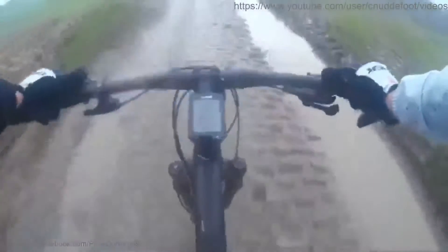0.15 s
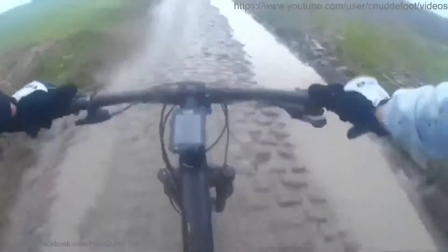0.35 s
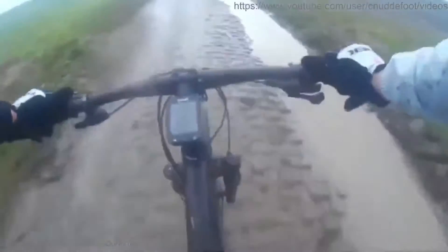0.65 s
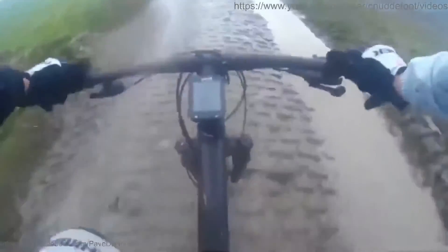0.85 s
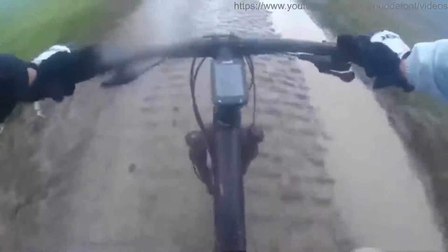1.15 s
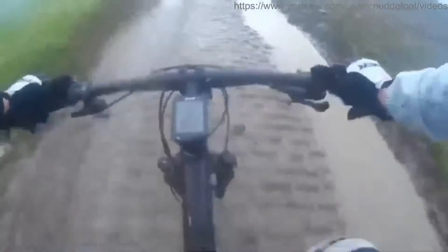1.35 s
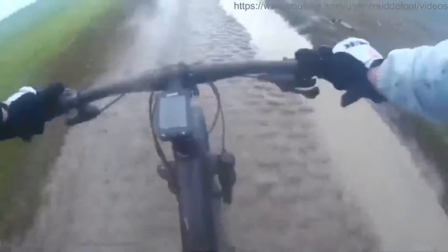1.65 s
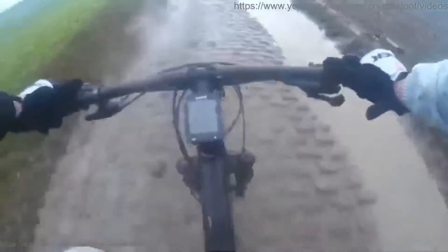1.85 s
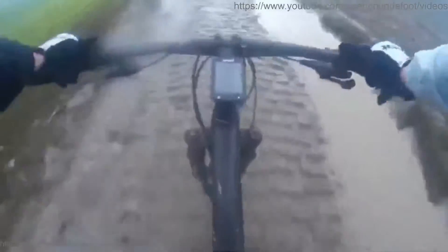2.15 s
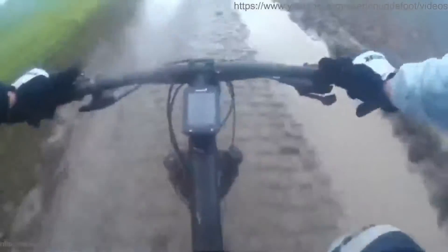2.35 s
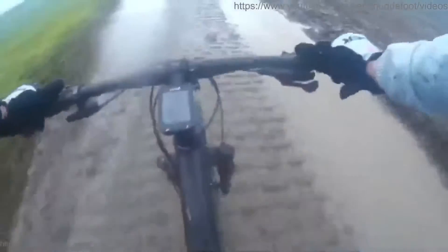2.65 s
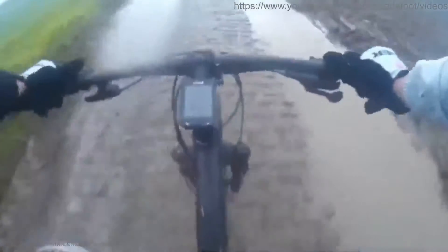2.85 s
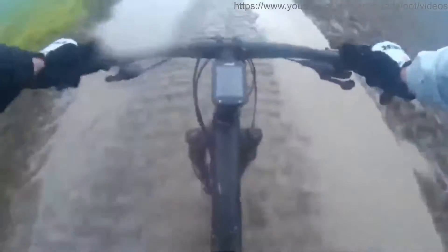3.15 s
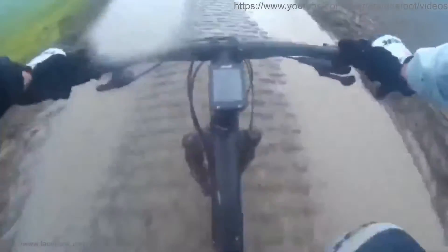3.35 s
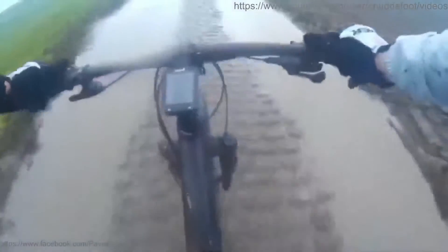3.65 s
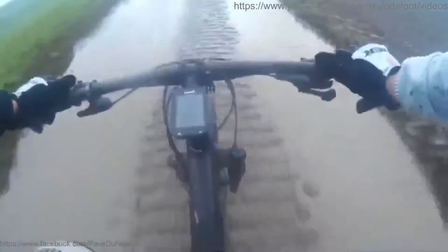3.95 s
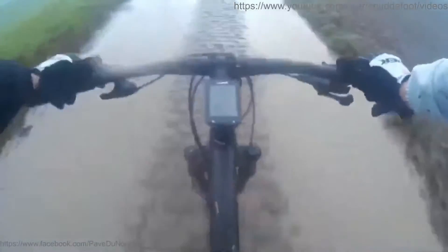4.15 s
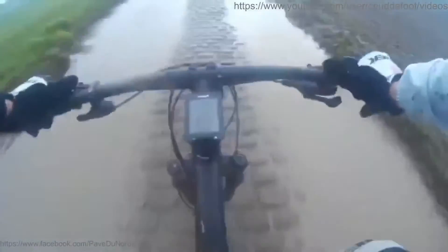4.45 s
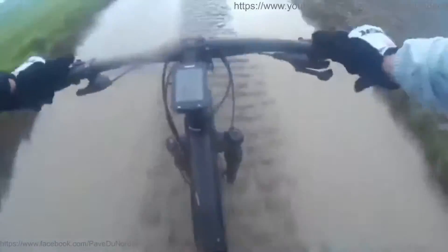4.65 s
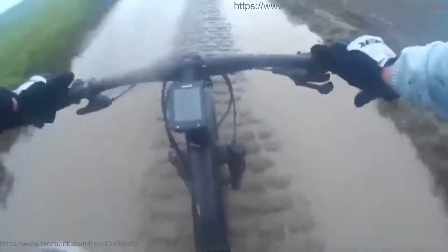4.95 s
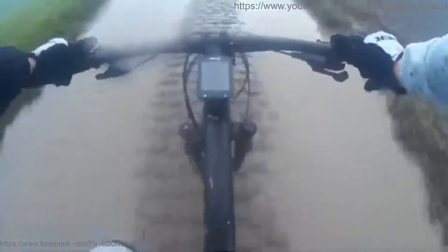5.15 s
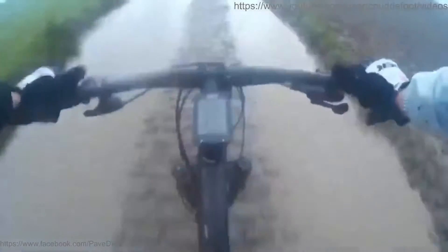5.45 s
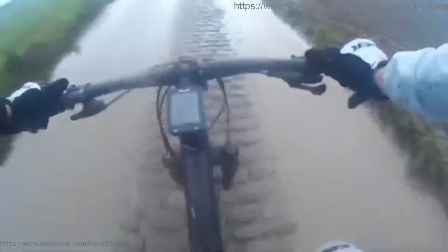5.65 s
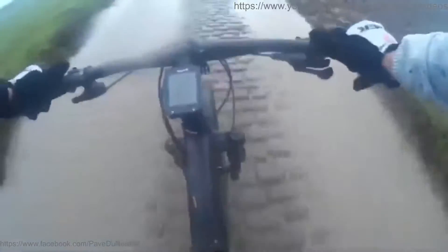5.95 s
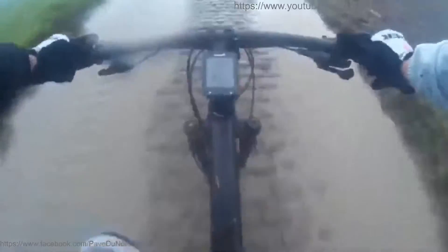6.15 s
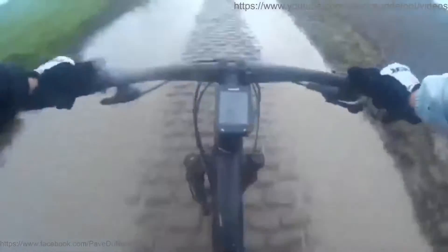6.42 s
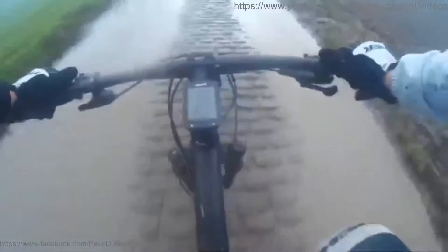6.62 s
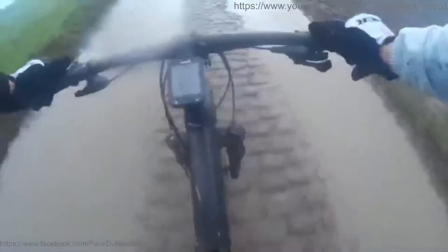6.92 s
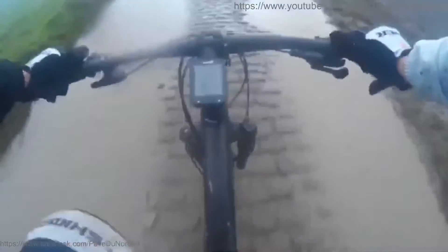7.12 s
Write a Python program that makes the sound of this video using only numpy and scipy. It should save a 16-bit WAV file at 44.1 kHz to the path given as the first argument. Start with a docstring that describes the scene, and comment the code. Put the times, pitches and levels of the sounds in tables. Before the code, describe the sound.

Muffled, booming wind and a constant dull rattle of bumpy stones, broken by knocks and thumps, with quiet muddy tyre spray and tiny squeaks.

```python
"""On wet, muddy cobbles: a bicycle rides fast, heard by a camera in a closed case on the rider's chest.
Wind (shaped noise), deep single thumps (short cosine swings) and hums (gliding sines) reach the case.
The stones shake it: random blows make a dull rattle, damped case modes make thuds, clacks and taps.
The tyres swish and throw grit (noise, drops, bubbles); a wet part squeaks in gliding tones."""
import sys
import numpy as np
from scipy import signal
from scipy.fft import rfft, irfft, next_fast_len
from scipy.io import wavfile
from scipy.ndimage import uniform_filter1d

SR = 44100
rng = np.random.default_rng(int(sys.argv[2]) if len(sys.argv) > 2 else 0)


def digitize_waveform(pressure):
    """Quantize a signal to 16-bit integers and store it at the path in sys.argv[1].

    Rows of a 2-D input are taken as channels; values are limited to [-1, 1].
    """
    field = np.atleast_2d(pressure).T
    bounded = np.clip(field, -1, 1)
    quanta = np.round(bounded * 32767).astype(np.int16)
    wavfile.write(sys.argv[1], SR, quanta)


N = 321288

# Modes of the case and its mount. Each row: frequency in Hz, relative level in dB, t60 in seconds.
CASE_MODES = [(337, -21, 0.011), (488, 8, 0.025), (561.5, 0, 0.26), (656, 2.5, 0.044), (769.5, 6, 0.03),
              (1177, -1, 0.024), (1274, -15, 0.057), (1840, -17, 0.035), (2274, -7, 0.044),
              (2740, -18, 0.03), (3175, -18, 0.065), (3700, -15, 0.043), (3945, -14.5, 0.047),
              (4380, -17, 0.031), (5030, -19, .02), (8130, -15, .015)]


def undb(db):
    """Decibels to gain."""
    return 10 ** (np.asarray(db) / 20)


def unit(x):
    """Scale to an rms of one."""
    return x / np.sqrt(np.mean(x ** 2))


def peak(x, db):
    """Scale to a peak level in dB."""
    return undb(db) * x / np.abs(x).max()


def colour(x, spectrum):
    """Minimum-phase filter through (Hz, dB) points, so that blows keep sharp fronts; rms of one."""
    hz, db = np.transpose(spectrum)
    size = next_fast_len(N + SR // 4)
    size += size % 2
    f = np.maximum(np.arange(size // 2 + 1) * SR / size, 1)
    gain = undb(np.interp(np.log(f), np.log(hz), db))
    cepstrum = irfft(np.log(gain))
    # fold the cepstrum to its causal half
    cepstrum[1:size // 2] *= 2
    cepstrum[size // 2 + 1:] = 0
    response = np.exp(rfft(cepstrum))
    return unit(irfft(rfft(x, size) * response)[:N])


def band(x, lo_hz, hi_hz):
    """Gentle band-pass."""
    sos = signal.butter(2, [lo_hz, hi_hz], "band", fs=SR, output="sos")
    return signal.sosfilt(sos, x)


def walk(rate_hz):
    """Random levels held 1 / rate_hz seconds and smoothed twice; rms of one."""
    k = int(SR / rate_hz)
    held = np.repeat(rng.standard_normal(N // k + 1), k)
    return unit(uniform_filter1d(uniform_filter1d(held, k), k)[:N])


def patter(rate_hz, spread_db):
    """Random tiny blows of either sign and unequal size, rate_hz a second on average; rms of one."""
    hits = rng.random(N) < rate_hz / SR
    signs = rng.choice([-1, 1], N)
    sizes = undb(spread_db * rng.standard_normal(N).clip(-2, 2))
    return unit(hits * signs * sizes)


def follow(curve):
    """Each level column of a table with time in seconds first, joined by straight lines."""
    s, *columns = np.transpose(curve)
    return [np.interp(np.arange(N) / SR, s, column) for column in columns]


def add(out, s, sound):
    """Mix a sound in at time s in seconds."""
    i = max(int(s * SR), 0)
    out[i:i + len(sound)] += sound[:max(N - i, 0)]


def case_ring(modes=CASE_MODES, swell_s=0.001):
    """The case's answer to one tap: decaying modes, the attack rounded by its rubber mount."""
    t = np.arange(SR // 10) / SR
    ring = np.zeros(len(t))
    for hz, db, t60_s in modes:
        ring += undb(db) * np.sin(2 * np.pi * hz * t) * np.exp(-np.log(1000) * t / t60_s)
    return ring * (1 - np.exp(-(t / swell_s) ** 2))


def hiss(level_db=-69.5, swing_db=0.65):
    """The microphone's own noise, its level swinging slightly."""
    # Each row: frequency in Hz, relative density in dB per Hz.
    hiss_spectrum = [(100, 0), (3000, 0), (8000, 0), (15000, 0)]
    level = undb(level_db + swing_db * walk(13))
    return level * colour(rng.standard_normal(N), hiss_spectrum)


def wind(buffet_trim_db=0.5, flutter_trim_db=-1.5, eddy_swing_db=0.17, burst_swing_db=1.12):
    """Turbulent pressure on the case: large eddies boom, small ones burst against it one by one."""
    # Each row: start in seconds, large-eddy level in dB, small-eddy level in dB, both before trim.
    wind_curve = [(0.0, -32, -25.5), (0.1, -38.5, -35.5), (0.23, -34.5, -30.5), (0.49, -37, -38.5),
                  (0.75, -36.5, -32), (0.96, -33, -33.5), (1.1, -37, -35), (1.25, -34.5, -36.5),
                  (1.36, -40.5, -39.5), (1.78, -36.5, -38), (2.04, -34, -33.5), (2.16, -29, -30),
                  (2.23, -34, -37), (2.34, -32.5, -34.5), (2.47, -32.5, -33.5), (2.58, -33.5, -31.5),
                  (2.7, -44, -31), (2.76, -40, -48), (2.88, -33, -28.5), (3.0, -35, -37),
                  (3.19, -34, -31.5), (3.4, -36.5, -38), (3.5, -33.5, -34.5), (3.75, -35, -38.5),
                  (3.87, -36.5, -43.5), (4.06, -33.5, -34), (4.29, -34, -31.5), (4.38, -38.5, -38.5),
                  (4.58, -32.5, -32), (4.72, -41.5, -40.5), (4.97, -35.5, -40.5), (5.04, -36, -32),
                  (5.17, -37.5, -35), (5.27, -35.5, -30), (5.45, -34, -37), (5.68, -39.5, -43),
                  (5.78, -36, -37), (6.02, -38, -36.5), (6.14, -38, -36), (6.36, -34, -31),
                  (6.54, -40, -35), (6.66, -34, -33.5), (6.87, -32, -35.5), (7.02, -29.5, -40.5),
                  (7.09, -38, -38.5), (7.18, -32, -34.5), (7.29, -36, -34)]
    # Spectra of large and small eddies. Each row: frequency in Hz, relative density in dB per Hz.
    buffet_spectrum = [(8, -13), (20, 4), (45, 1.5), (90, -0.5), (125, -5.5), (180, -16.5), (400, -37.5),
                       (1500, -71.5)]
    flutter_spectrum = [(50, -11.5), (100, -1), (135, 0.5), (200, -3), (250, -5), (330, -11.5),
                        (800, -26.5), (1500, -43), (4000, -71)]
    buffet_db, flutter_db = follow(wind_curve)
    large = colour(rng.standard_normal(N), buffet_spectrum)
    large *= undb(eddy_swing_db * walk(20).clip(-2, 2))
    bursts = rng.standard_normal(N) + undb(-5) * patter(220, spread_db=2.5)
    small = colour(bursts, flutter_spectrum)
    small *= undb(burst_swing_db * walk(22).clip(-2, 2))
    return large * undb(buffet_db + buffet_trim_db) + small * undb(flutter_db + flutter_trim_db)


def thumps(width_cycles=0.29):
    """Deep single thumps, from wind eddies or hard knocks: each a cosine in a Gaussian."""
    # Each row: centre in seconds, peak in dB, pitch in Hz.
    thump_rows = [(1.496, -22, 45), (1.941, -24, 70.4), (2.365, -22, 39.5), (3.185, -19.5, 70),
                  (4.282, -18, 70.5), (4.722, -22.5, 38), (6.27, -25, 50.3)]
    out, now = np.zeros(N), np.arange(N) / SR
    for s, db, hz in thump_rows:
        cycles = (now - s) * hz
        out += undb(db) * np.cos(2 * np.pi * cycles) * np.exp(-(cycles / width_cycles) ** 2)
    return out


def hums(waver=0.046, rough_db=2.0, trim_db=1.5):
    """Air shedding off the edge of the case gives a short, unsteady low tone of rising pitch."""
    # Each row: start in seconds, length in seconds, first and last pitch in Hz before waver,
    # level in dB before trim and roughness.
    hum_rows = [(0.9, 0.12, 187, 219, -37), (1.987, 0.094, 186.4, 246, -29.5), (2.076, .1, 247, 289, -35.5)]
    out, now = np.zeros(N), np.arange(N) / SR
    wobble, rough = 1 + waver * walk(120), rough_db * walk(100)
    for s, length_s, first_hz, last_hz, db in hum_rows:
        on = (now > s) & (now < s + length_s)
        pitch_hz = np.linspace(first_hz, last_hz, on.sum()) * wobble[on]
        phase = 2 * np.pi * np.cumsum(pitch_hz) / SR
        out[on] += undb(db + trim_db + rough[on]) * np.hanning(on.sum()) * np.sin(phase)
    return out


def squeaks(waver=0.025, scrape_db=-9, fade_db=17):
    """A wet rubbing part squeals: a gliding tone swells and breaks off, with faint scraping noise."""
    # Each row: start in seconds, length in seconds, first and last pitch in Hz before waver,
    # loudest point as a share of the length, tone level there in dB.
    squeak_rows = [(3.14, 0.038, 2100, 1820, .3, -52.5), (3.168, 0.023, 2150, 1860, .5, -53),
                   (4.239, 0.046, 1545, 2240, 0.8, -45), (4.284, .013, 1930, 2250, .5, -56),
                   (6.75, 0.031, 1860, 1970, .4, -57), (6.827, 0.051, 1855, 2080, 0.6, -54)]
    out, now = np.zeros(N), np.arange(N) / SR
    wobble = 1 + waver * walk(450)
    scrape = undb(scrape_db) * unit(band(rng.standard_normal(N), 1600, 2310))
    for s, length_s, first_hz, last_hz, crest, db in squeak_rows:
        on = (now > s) & (now < s + length_s)
        along = (now[on] - s) / length_s
        pitch_hz = np.interp(along, [0, 1], [first_hz, last_hz]) * wobble[on]
        fade = np.interp(along, [0, crest, 1], [1, 0, 1])
        size = undb(db - fade_db * fade ** 1.05) * signal.windows.tukey(len(along), 0.1)
        phase = 2 * np.pi * np.cumsum(pitch_hz) / SR
        out[on] += size * (np.sin(phase) + scrape[on])
    return out


def grit(tyre_db, level_db=-8):
    """Sand and mud flung from the tread tick against the frame, following the tyre level."""
    ticks = band(band(patter(240, spread_db=3.5), 1630, 2540), 1350, 3200)
    return undb(tyre_db + level_db) * unit(ticks)


def bubbles(rate_hz=110, decay_s=0.005, attack_s=0.0011):
    """Tiny bubbles burst in the puddles, each a decaying ping at its own rising pitch."""
    out, t = np.zeros(N), np.arange(SR // 20) / SR
    envelope = np.exp(-t / decay_s) * (1 - np.exp(-t / attack_s))
    for when, pitch, size in rng.random((int(rate_hz * N / SR), 3)):
        start_hz = 1650 * 1.4 ** pitch
        ping = np.sin(2 * np.pi * start_hz * (t + 1.1 * t ** 2)) * envelope
        add(out, when * N / SR, undb(14 * size ** 2) * ping)
    return unit(out)


def swish(tyre_db, dull_hz=2760, dull_above_db=-69):
    """Muddy water flung from the tread: fine spray with drops and bubbles, duller when loud."""
    # Each row: frequency in Hz, relative density in dB per Hz.
    swish_spectrum = [(700, -42), (1400, 1.5), (1600, -2), (1700, 3.5), (2050, 0.5), (2280, -9),
                      (2480, -13.5), (2700, -6.5), (3000, -13.5), (3350, -15.5), (3700, -11.5),
                      (4600, -18.5), (6500, -34.5)]
    spray = rng.standard_normal(N) + undb(-8) * patter(260, spread_db=3.5)
    spray *= undb(3.3 * walk(66).clip(-2, 2))
    splash = colour(spray, swish_spectrum) + undb(-7.5) * bubbles()
    dull = signal.sosfiltfilt(signal.butter(3, dull_hz, fs=SR, output="sos"), splash)
    # the treble stops growing above dull_above_db
    treble_db = np.minimum(tyre_db, dull_above_db) + 3
    return dull * undb(tyre_db) + (splash - dull) * undb(treble_db)


def chatter(level_db=-66):
    """The shaking mount keeps tapping lightly and dully against the case."""
    taps = patter(160, spread_db=2)
    return undb(level_db) * unit(signal.fftconvolve(taps, band(case_ring(), 1110, 1390))[:N])


def clacks(bounce_db=-10, settle_s=0.0045, spot_db=1, detune=0.011, contact_cycles=2.2,
           crack_db=3, crack_s=0.0054, body_db=1):
    """A hard mount contact cracks, chatters and rings the case; each spot favours other modes."""
    # Each row: start in seconds, peak in dB of the low knock, of the middle clank, of the high tick.
    clack_rows = [(.157, -62, -75, -62), (.172, -58, -68, -62), (.184, -46, -52, -61),
                  (0.8418, -41.5, -52, -59.5), (1.223, -44, -56, -65), (1.266, -46, -60, -70),
                  (1.280, -48, -56, -68), (1.297, -49, -58, -68), (1.409, -47, -63, -66),
                  (1.435, -43.5, -66, -66), (1.722, -47, -64, -62), (1.789, -49, -63, -63),
                  (1.882, -39.5, -59, -59), (2.109, -46, -53, -59), (2.325, -42.5, -57, -66),
                  (2.815, -47, -61, -65), (2.832, -56, -62, -65), (3.463, -44, -53, -60),
                  (4.331, -56, -64, -66), (4.353, -46, -55, -66), (4.567, -40.5, -58, -72),
                  (4.7105, -35, -47, -57), (4.767, -45, -52, -65), (5.254, -45, -52, -72),
                  (5.640, -39.5, -55, -65), (5.685, -48, -63, -63), (5.727, -47, -58, -55.5),
                  (5.7425, -33, -51, -60), (5.808, -43, -63, -64), (6.051, -44.5, -61, -72),
                  (6.133, -43.5, -62, -60), (6.2582, -41, -51, -56.5), (6.416, -45, -53, -61),
                  (6.838, -40.5, -61, -70), (7.273, -39, -54, -57)]
    # mode families, from and to in Hz
    body_hz, knock_hz, clank_hz, tick_hz = (600, 1000), (1000, 1500), (1500, 3400), (3400, 9000)
    out, t = np.zeros(N), np.arange(SR // 10) / SR
    settle = np.exp(-t / settle_s)
    for s, knock_db, clank_db, tick_db in clack_rows:
        bounces, noise = rng.standard_normal((2, len(t)))
        push = (t == 0) + undb(bounce_db) * bounces * settle / np.linalg.norm(settle)
        modes = []
        for hz, db, t60_s in CASE_MODES:
            spot_hz = hz * (1 + detune * rng.standard_normal())
            modes.append((spot_hz, db + spot_db * rng.standard_normal(), t60_s))
        families = ((body_hz, knock_db + body_db), (knock_hz, knock_db),
                    (clank_hz, clank_db), (tick_hz, tick_db))
        for (lo, hi), db in families:
            family = [mode for mode in modes if lo < mode[0] <= hi]
            ring = case_ring(family, swell_s=contact_cycles / lo)
            add(out, s, peak(signal.fftconvolve(push, ring), db))
        crack = noise * np.exp(-t / crack_s)
        crack = band(band(crack, 1300, 4300), 900, 5200) + undb(-14) * band(crack, 7700, 9300)
        add(out, s, peak(crack, tick_db + crack_db))
    return out


def thuds(spread=1.66):
    """Jolts from proud stones push softly on the low case modes, which the strap damps."""
    # Each row: start in seconds, peak in dB, centre of the push in Hz, damping time constant in seconds.
    thud_rows = [(0.068, -25.5, 500, 0.0033), (.409, -26.5, 620, 0.0036), (.922, -28, 526, 0.0044),
                 (1.267, -23, 550, 0.014), (1.584, -27, 597, 0.007), (1.882, -29, 620, .008),
                 (2.2428, -23.5, 570, 0.0068), (2.445, -24, 470, 0.009), (2.9133, -23, 800, 0.018),
                 (4.061, -25, 422, 0.0055), (4.565, -26, 800, 0.0039), (4.717, -30, 398, 0.0056),
                 (5.641, -25, 800, 0.0077), (5.658, -27, 480, 0.0064), (5.687, -23, 428, .005),
                 (5.7239, -20.5, 620, 0.01), (5.8074, -17.5, 554, 0.0061), (6.527, -22, 540, 0.0055),
                 (6.816, -28, 483, 0.0073)]
    out, case = np.zeros(N), case_ring()
    t = np.arange(len(case)) / SR
    for s, db, hz, damp_s in thud_rows:
        pushed = band(case, hz / spread, hz * spread)
        ring = band(pushed, 147, 650) * np.exp(-t / damp_s)
        add(out, s, -peak(ring, db))
    return out


def cobbles():
    """Stones pass under the wheels in quick uneven bumps: a dull rattle that also rings the case."""
    # Each row: start in seconds, shaking level in dB before the layer gains.
    shake_curve = [(0.0, -39), (0.9, -37.5), (1.03, -43), (1.15, -37), (1.8, -39), (1.88, -34.5),
                   (2.37, -42.5), (2.46, -37), (2.64, -41), (2.82, -37), (3.03, -40), (3.42, -37.5),
                   (3.72, -40), (3.9, -37.5), (4.12, -39.5), (4.45, -39.5), (4.55, -36), (4.75, -38.5),
                   (5.07, -37.5), (5.82, -38.0), (6.84, -37.0), (6.96, -44), (7.29, -37)]
    # Each row: frequency in Hz, relative density in dB per Hz.
    cobble_spectrum = [(60, -18.5), (170, -7), (240, -4), (330, 1.5), (440, -1), (520, -2.5), (620, -5.5),
                       (800, -13.5), (1000, -21), (1200, -27.5), (1430, -41.5), (2400, -45.5), (5000, -67)]
    shake_db, = follow(shake_curve)
    stones = undb(1.9 * walk(80).clip(-2.5, 1.6))
    blows = (patter(600, spread_db=1.5) + undb(-2.5) * rng.standard_normal(N)) * stones
    rattle = colour(blows, cobble_spectrum)
    taps = patter(150, spread_db=5.5) * stones
    ring = unit(signal.fftconvolve(taps, band(case_ring(), 427, 980))[:N])
    return (undb(0.48) * rattle + undb(-12) * ring) * undb(shake_db)


def scene():
    """Hiss, wind, thumps, squeaks, wet tyres and shaken case, summed to one channel."""
    # Level of the tyre swish and grit. Each row: start in seconds, level in dB before the layer gains.
    tyre_curve = [(0.0, -53.5), (0.1, -73.5), (0.2, -65), (0.3, -72), (0.46, -64.5), (0.54, -68.5),
                  (0.75, -69.5), (0.98, -69), (1.08, -65), (1.16, -65), (1.35, -72), (1.48, -63.5),
                  (1.56, -69), (1.72, -62.5), (1.82, -67.5), (2.13, -64.5), (2.42, -74), (2.64, -77),
                  (2.78, -61.5), (2.9, -65), (3.03, -68.5), (3.2, -67), (3.35, -73), (3.47, -62.5),
                  (3.6, -69), (3.78, -64.5), (4.11, -71), (4.5, -69), (4.61, -63), (4.8, -68), (4.87, -59),
                  (4.91, -63), (4.95, -72), (5.05, -68), (5.46, -71), (5.92, -64.5), (6.12, -68),
                  (6.7, -64), (6.85, -62.5), (6.96, -70.5), (7.29, -71)]
    tyre_db, = follow(tyre_curve)
    air = wind() + hums()
    tyres = grit(tyre_db) + swish(tyre_db)
    shaken = chatter() + clacks() + thuds() + cobbles()
    return (hiss() + air + thumps() + squeaks() + tyres + shaken)[None]


def record(dry, top_hz=14950):
    """The camera cuts the top with a steep elliptic low-pass."""
    return signal.sosfilt(signal.ellip(12, 0.1, 80, top_hz, fs=SR, output="sos"), dry)


dry = scene()
out = record(dry)
digitize_waveform(out)
```